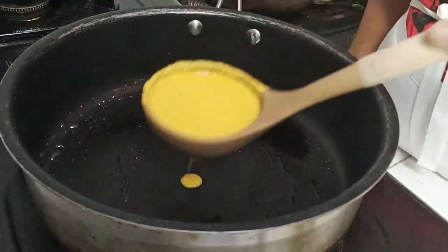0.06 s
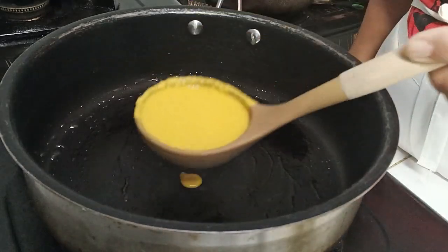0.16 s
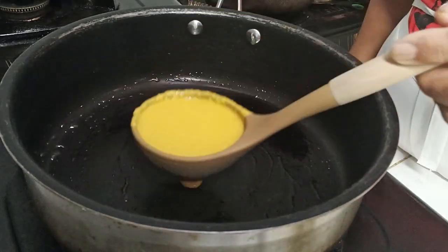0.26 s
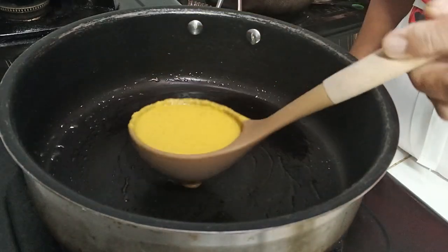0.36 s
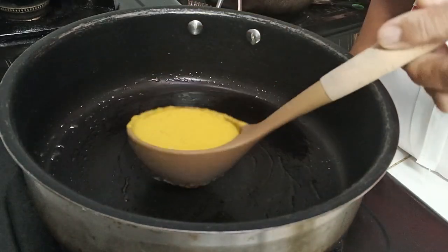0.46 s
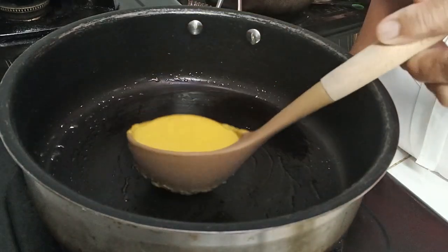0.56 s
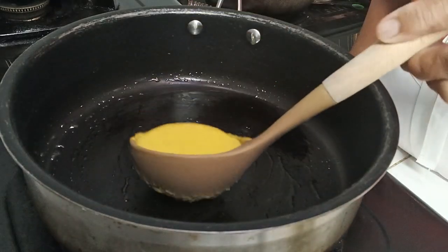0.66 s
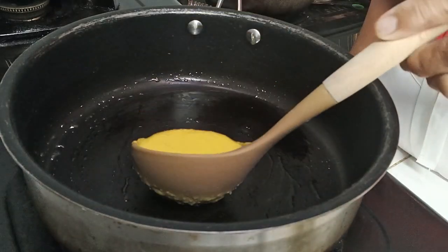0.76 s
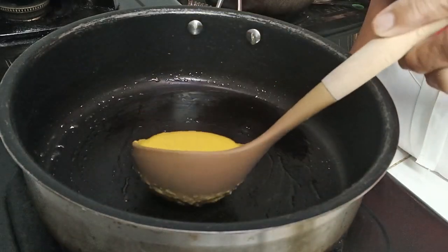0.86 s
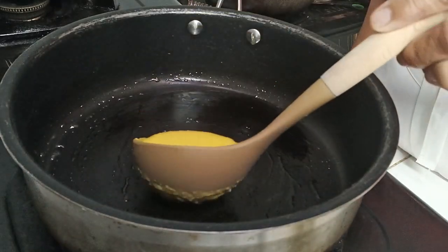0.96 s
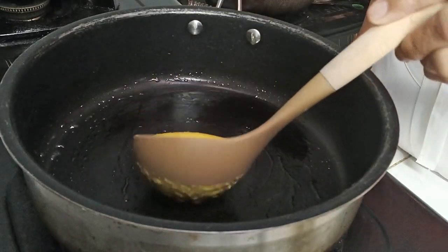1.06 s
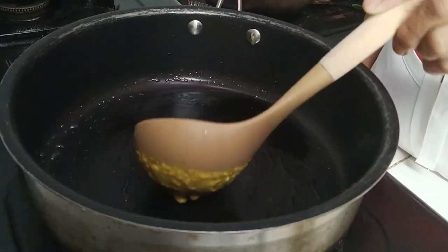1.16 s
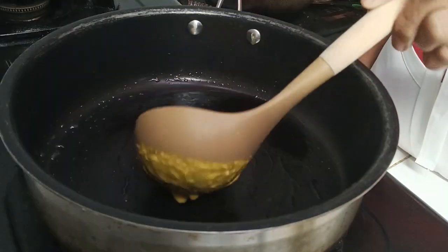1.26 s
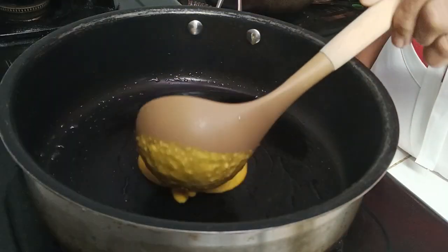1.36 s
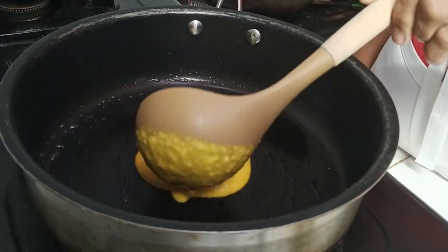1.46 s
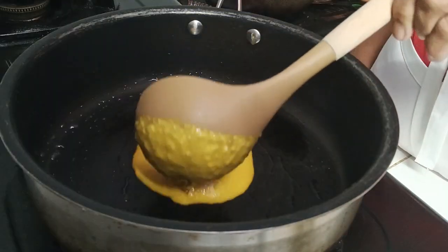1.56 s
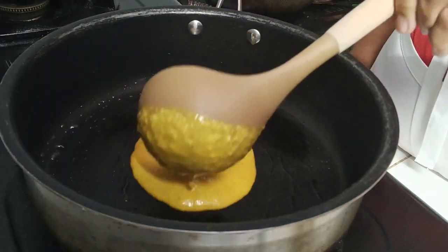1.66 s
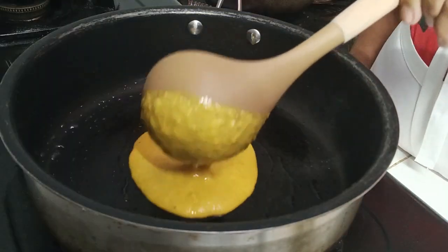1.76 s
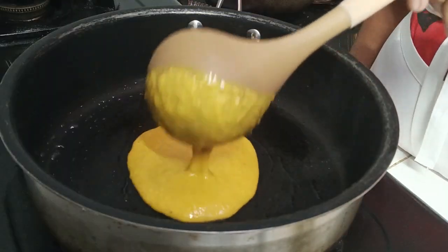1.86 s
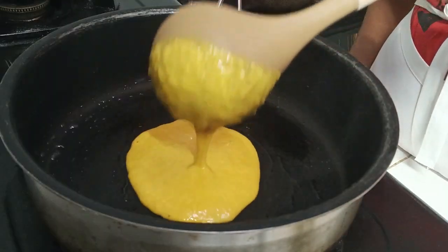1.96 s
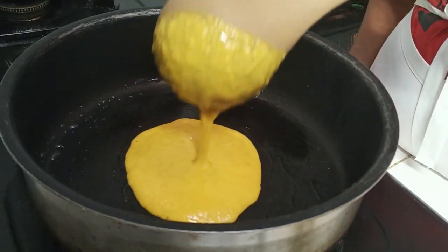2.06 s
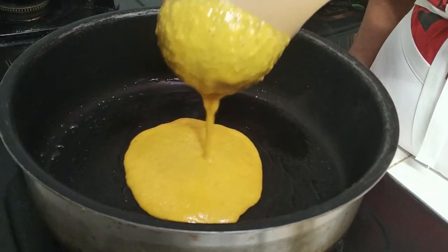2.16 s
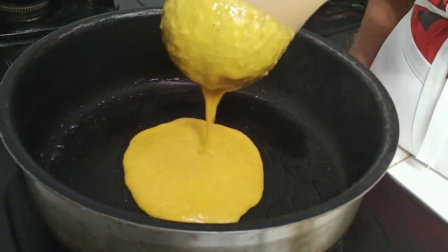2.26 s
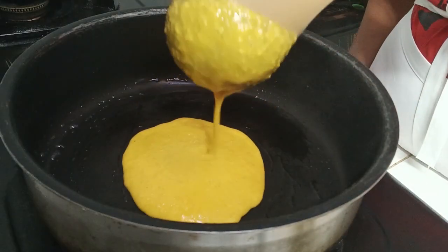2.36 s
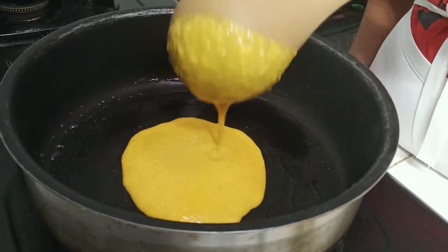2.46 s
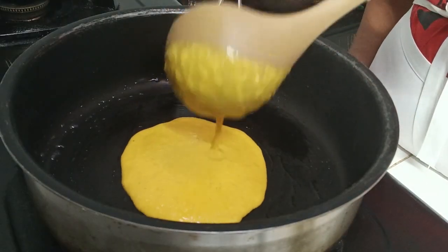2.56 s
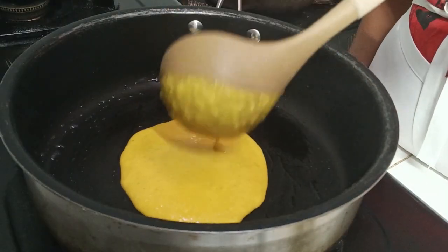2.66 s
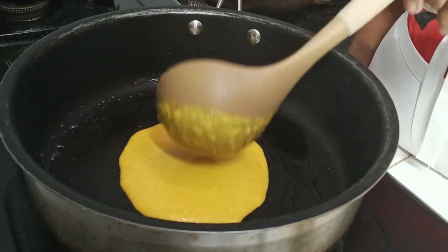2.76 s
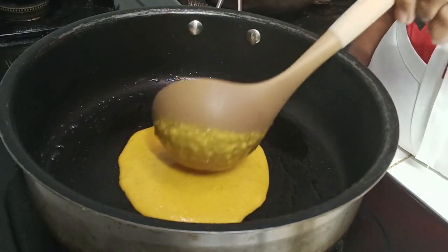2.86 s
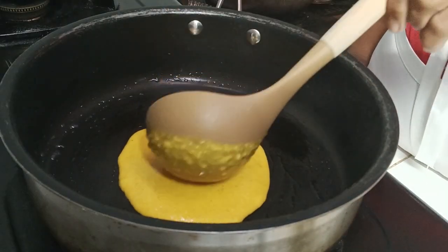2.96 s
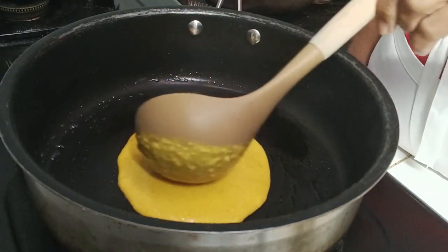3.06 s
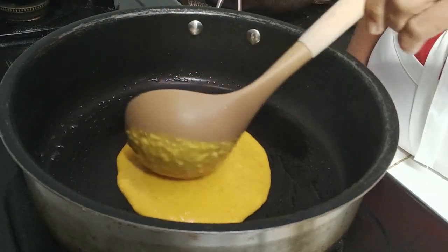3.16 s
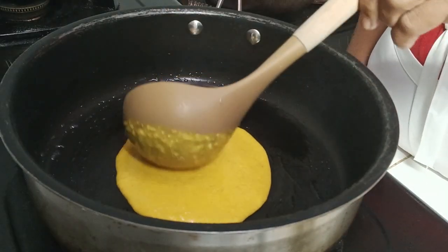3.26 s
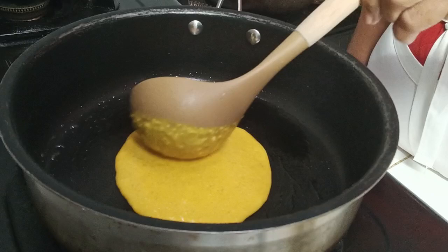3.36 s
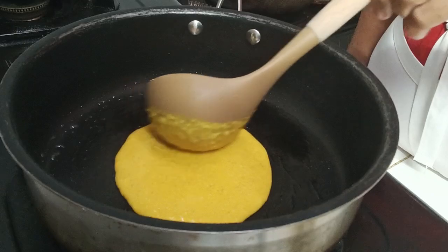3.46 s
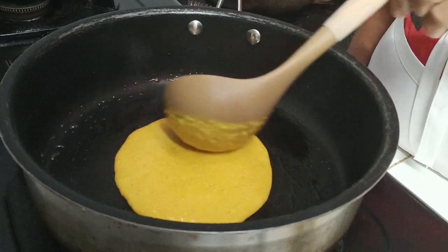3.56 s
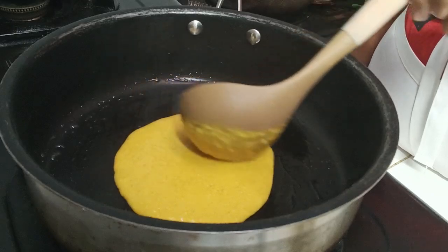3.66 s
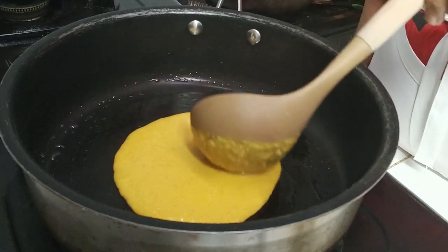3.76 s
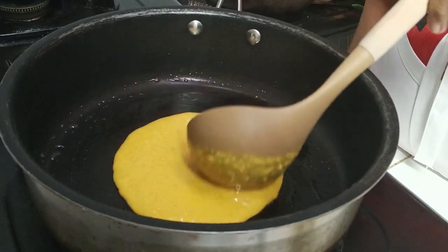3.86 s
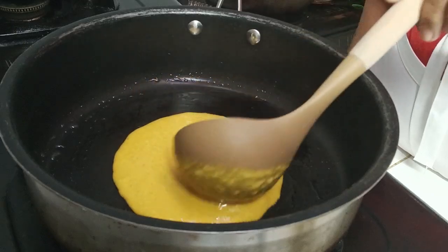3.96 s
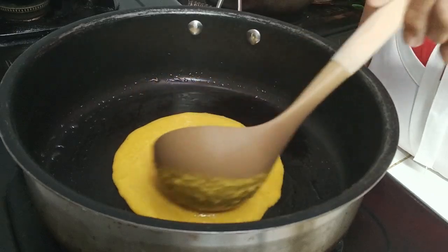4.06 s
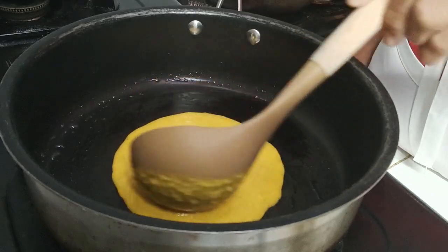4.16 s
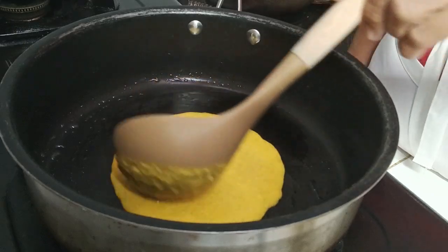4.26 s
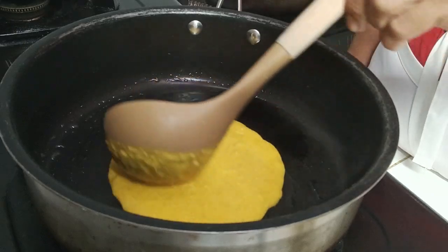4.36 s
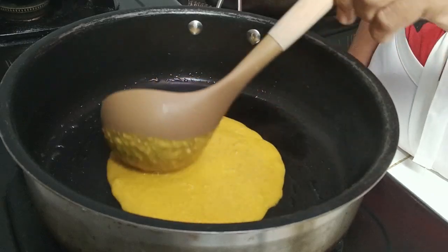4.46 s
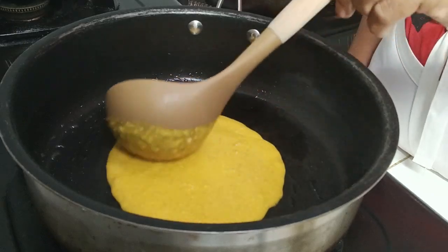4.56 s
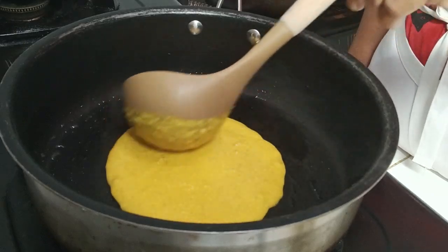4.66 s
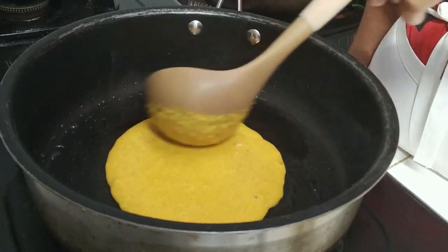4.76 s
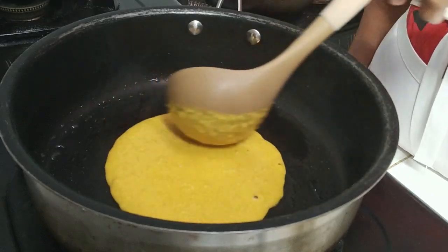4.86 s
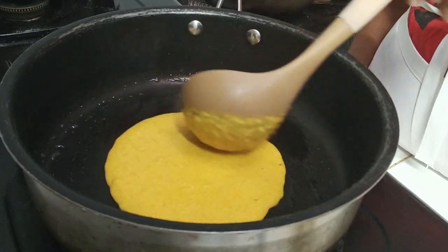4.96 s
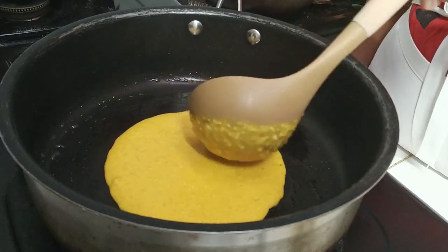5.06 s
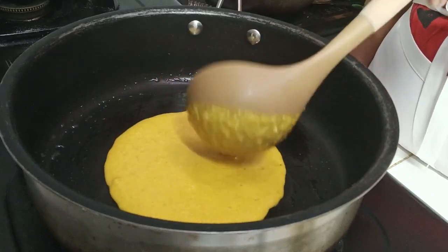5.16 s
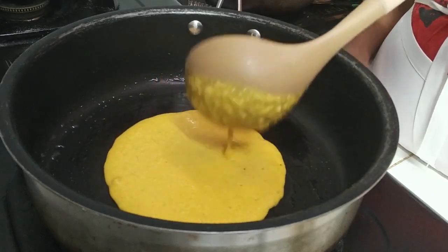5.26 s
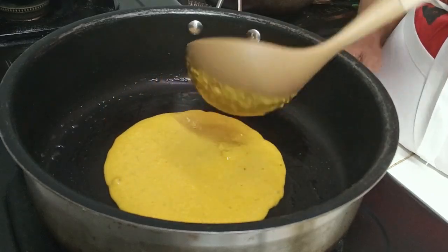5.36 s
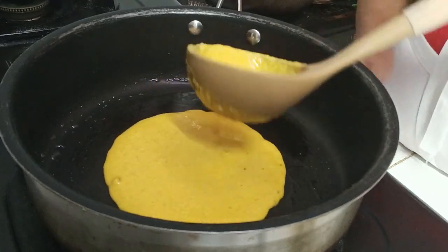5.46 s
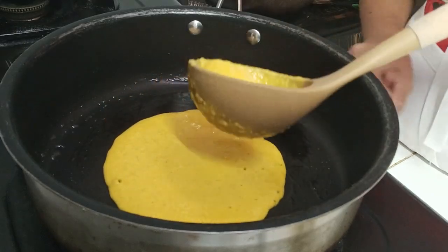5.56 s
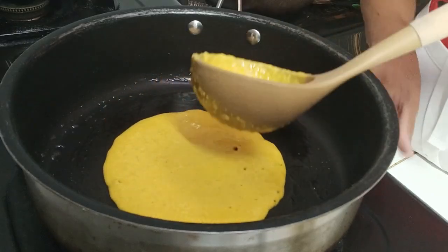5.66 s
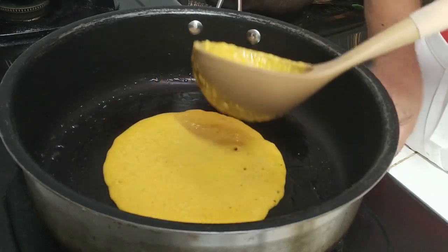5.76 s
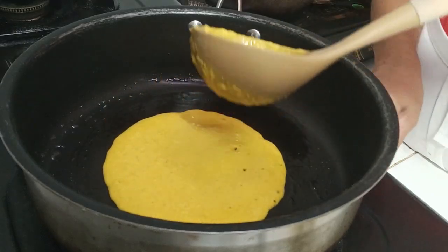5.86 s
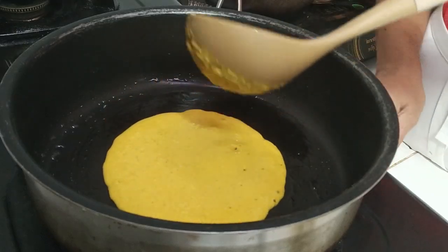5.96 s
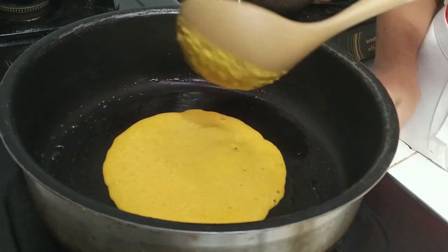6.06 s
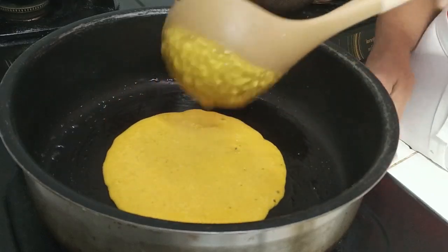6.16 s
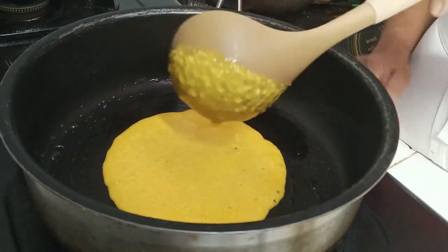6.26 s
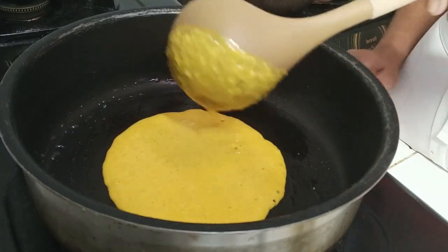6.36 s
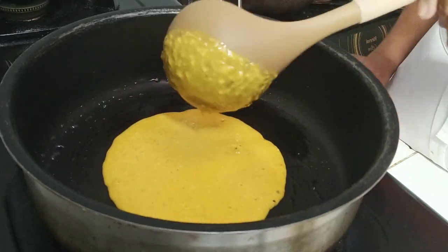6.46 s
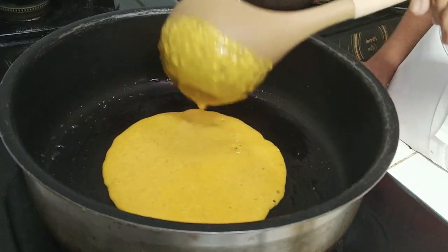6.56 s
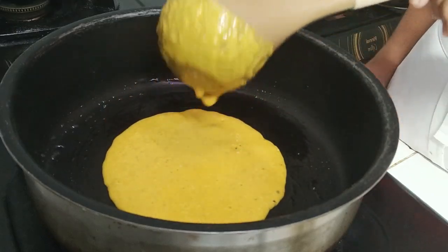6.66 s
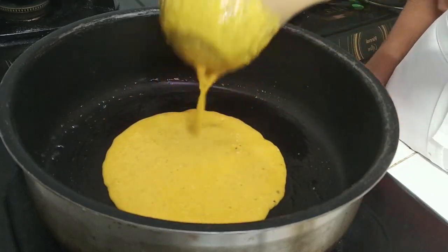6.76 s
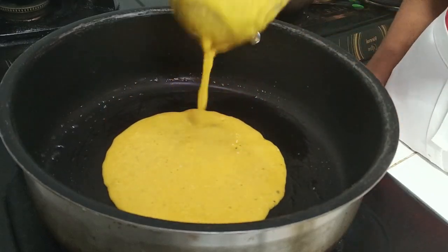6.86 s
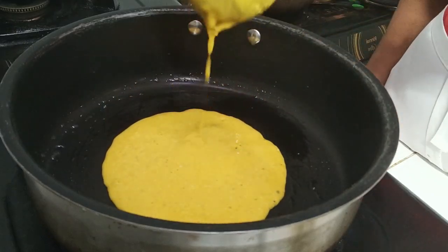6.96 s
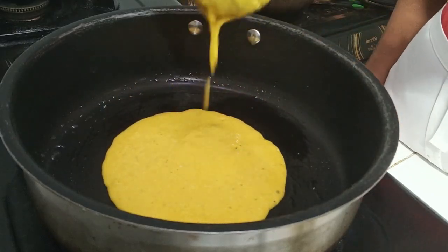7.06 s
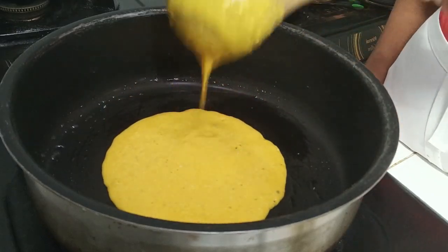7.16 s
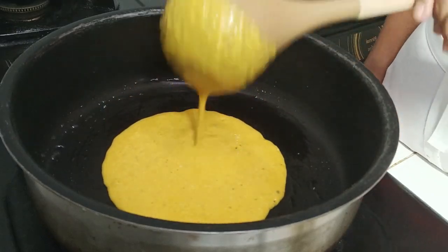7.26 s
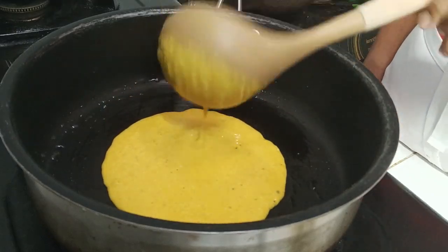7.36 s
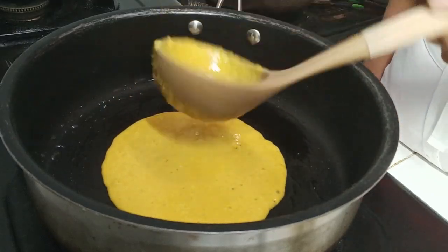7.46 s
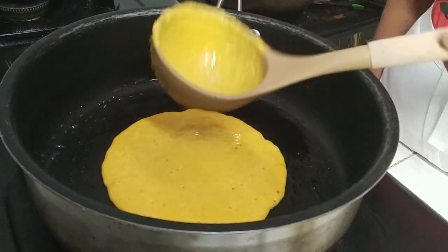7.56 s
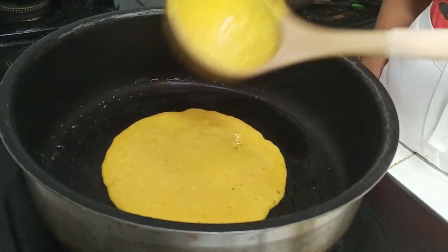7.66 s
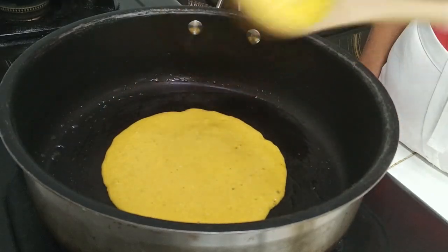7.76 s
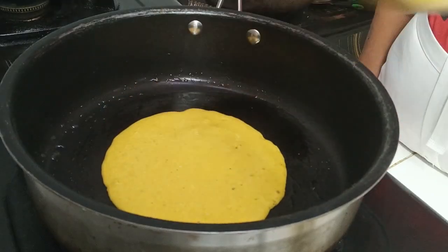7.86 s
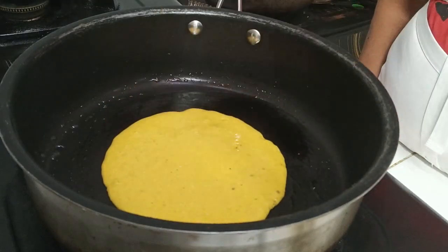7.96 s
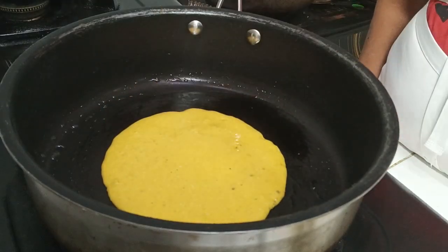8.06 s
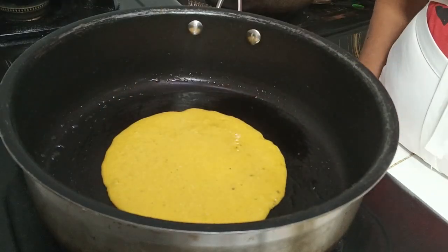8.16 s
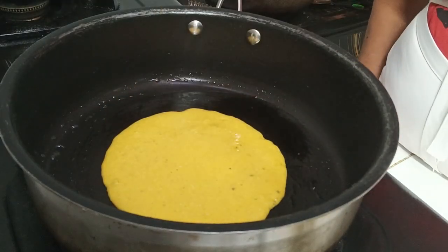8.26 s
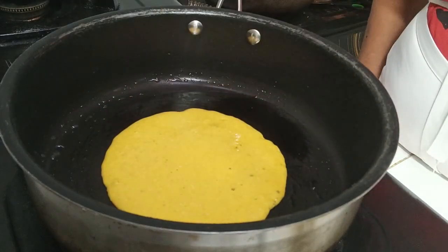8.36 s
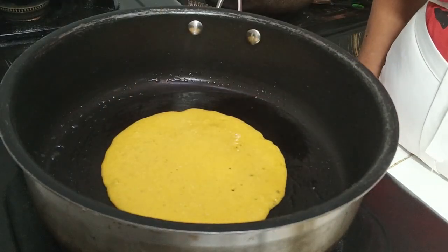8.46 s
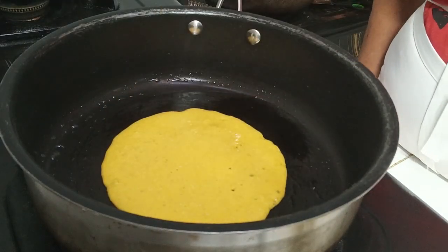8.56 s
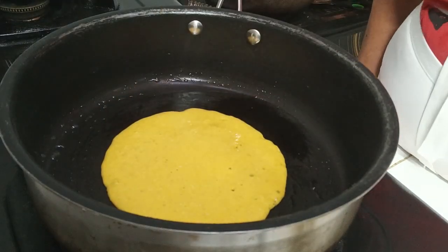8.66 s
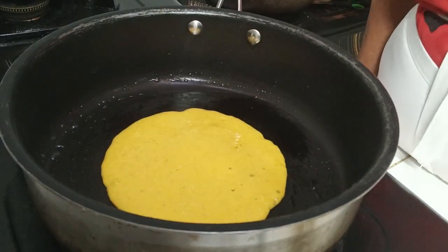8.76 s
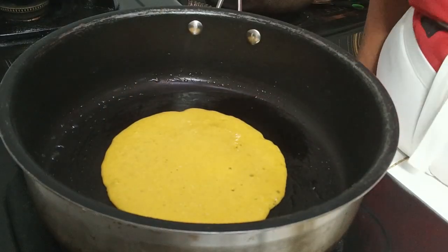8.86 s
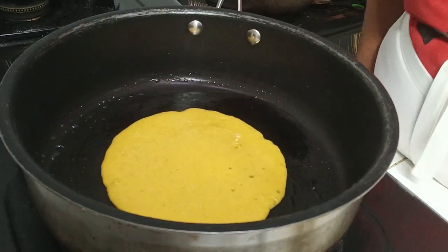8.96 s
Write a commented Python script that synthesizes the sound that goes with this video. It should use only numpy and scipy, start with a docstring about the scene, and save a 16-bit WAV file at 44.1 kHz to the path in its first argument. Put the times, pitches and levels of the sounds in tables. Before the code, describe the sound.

Batter sizzles in a hot oiled pan, swelling loudly as it is poured, then settling into a steady, crackling fry.

```python
"""In a kitchen, a ladle of batter touches down in a hot oiled pan and is poured out and spread.
Steam bubbles burst by the thousand. Trapped under the ladle, they ring the gap and batter pocket;
the pan squeals as the ladle rubs. As the batter sets, the bubbles thin to a crackle.
Three specks of spitting oil strike the right of a close microphone's two openings (ports), and the
last makes a limiter dip the volume. Behind it all, the room and a far engine drone faintly."""
import sys
import numpy as np
from scipy import signal
from scipy.fft import rfft, irfft, next_fast_len
from scipy.io import wavfile
from scipy.ndimage import uniform_filter1d, minimum_filter1d

SR = 44100
rng = np.random.default_rng(int(sys.argv[2]) if len(sys.argv) > 2 else 0)


def pcm_store(signal):
    """Save signal as 16-bit PCM."""
    levels = np.round(np.clip(np.atleast_2d(signal), -1, 1) * 32767)
    wavfile.write(sys.argv[1], SR, levels.astype(np.int16).T)


N = 397202
TIME = np.arange(N) / SR

# the tone of the room's drone: pitch_hz, gain_db
ROOM_TONE = [(20, -38.5), (45, -18.5), (80, -1), (125, 0), (180, 0), (300, -10.5), (450, -18.5), (700, -14),
             (2000, -21)]
# the note of a far engine outside: time_s, pitch_hz, left_level_db
ENGINE_NOTE = [(0, 117.1, -62.5), (5, 122.3, -66.5), (6.3, 136.6, -52.5), (7, 126.9, -67.5),
               (8.1, 127.9, -57), (8.65, 127.9, -47), (9, 147.3, -53)]
# how each port colours the frying: pitch_hz, left_gain_db, right_gain_db
PORT_TONE = [(96, -19.5, -36), (292, -11, -20), (456.3, -10, -13.5), (621, -2, -6), (1208, -5, -8.5),
             (3065, -2.5, -9), (4490, -1.5, -4), (5636, -1.5, 3), (6494, -3, 10), (7481, -11.5, 3.5),
             (7945, -11.5, -5.5), (10550, -16, -14), (13000, -10.5, -18.5), (14430, -4.5, -7),
             (14120, -1.5, -4)]
# air ringing in the pan's bowl (a minus share swings the other way):
# pitch_hz, width_hz, left_share, right_share
BOWL_RINGS = [(393.6, 14.9, 1.28, 0.97), (693, 81, 0.3843, 0.15), (814.8, 71, 0.5777, 0.94),
              (984.4, 102, -0.58, -0.16), (1124.6, 84.9, -3.5, 1), (1708, 852, 0.44, 0.327),
              (2740, 90, 0.6, 0.5), (3100, 240, -0.4429, -0.31), (3463, 170, 0.3949, -0.22)]
# oil specks hitting the right port: time_s, push_gain_db, tick_peak_db (before the limiter)
OIL_SPECKS = [(1.4762, -13, -25), (6.8979, -17.5, -21), (8.5039, 4, 8.3)]
# single loud bubbles: time_s, right_peak_db
LOUD_POPS = [(.2842, -20), (.3135, -19), (.3269, -19), (.3353, -16), (.3675, -21), (.399, -20), (.415, -19),
             (.442, -15), (.4822, -9.5), (.5145, -16), (.54, -16), (.586, -17), (.6333, -10), (.692, -16),
             (.7372, -12), (.8, -14), (.8857, -9), (3.491, -12), (4.321, -12), (4.906, -16), (5.101, -12),
             (6.375, -14), (6.389, -13), (6.404, -15), (6.5125, -12.5), (6.5335, -15), (6.5818, -10.5),
             (7.443, -18), (7.477, -18.5), (7.5222, -20), (7.7105, -21), (7.7483, -16), (7.8328, -19),
             (7.895, -14), (7.968, -21), (8.006, -20), (8.0304, -21), (8.0824, -21), (8.125, -19),
             (8.2027, -17), (8.3034, -18), (8.3873, -19), (8.6087, -20), (8.6505, -21), (8.7456, -19),
             (8.97, -21)]
# ringing of the thin gap under the ladle: pitch_hz, width_hz, gain_db
GAP_RINGS = [(1012.6, 37, -18), (1297.5, 10.1, -13), (2137, 110, -4), (2645, 22, -7.5), (2799, 40, -11.5),
             (3043, 39, -7.5), (3647, 129, -9.5), (4320, 21.4, -8), (5769, 105, -5)]
# ringing of the pocket of batter under the ladle: pitch_hz, width_hz, gain_db
POCKET_RINGS = [(329.7, 49.5, -13), (438.4, 92.3, -7), (618.2, 91.3, -4), (818.4, 37, -1), (908, 45.5, 4),
                (1004, 27, -7), (1305, 61, -8), (2327, 98, -3.5), (2655.4, 75, 1), (3037, 52, -6),
                (3780, 77, -2.5)]
# the metal pan's own notes above its whistle: pitch_hz, gain_db
PAN_HIGH_NOTES = [(2697, -6), (4540, 3), (4920, -4), (5772, -3)]
# the wet ladle touches, rests, then presses down: start_s, length_s, gap_gain_db, pocket_gain_db
LADLE_TOUCHES = [(0.074, 0.102, -39, -55), (0.262, 0.583, -45, -60), (0.895, 0.332, -39.5, -37)]
# the pan squeals as the ladle rubs: start_s, length_s, whistle_gain_db, high_notes_gain_db
PAN_SQUEALS = [(0.08, 0.0965, -49.5, -44), (0.265, 0.045, -47, -57.5), (0.745, 0.155, -43, -61.5),
               (.92, 0.34, -46, -44.5), (1.195, 0.044, -40, -39), (1.301, 0.088, -51, -45)]
# the steady hiss, as more or less wet batter meets the metal: time_s, base_level_db
HISS_LEVELS = [(0, -75), (.03, -38.5), (.23, -36.5), (.3, -36.8), (.66, -35.8), (.9, -28.5), (1.37, -26.5),
               (1.48, -36.5), (1.57, -32.5), (2.36, -33), (2.9, -33.5), (3.44, -36.5), (3.69, -32),
               (4.58, -36), (4.8, -35), (5.15, -35.7), (5.48, -33.5), (6.05, -43), (6.51, -35.5),
               (6.95, -39), (7.65, -38.3), (8.23, -41.5), (9, -39)]
# spurts of steam from under the batter, building up and quickly spent: peak_s, build_up_s, boost_db
STEAM_SPURTS = [(.11, 0.098, 5), (.7, 0.0274, 3.5), (2.1, 0.117, 1.68), (2.48, 0.25, 2.3), (3.07, 0.078, 0),
                (3.2, 0.036, 2.5), (3.34, 0.197, 0.5), (4.33, 0.15, 3), (4.53, 0.115, 5), (5.1, 0.172, 3.5),
                (5.55, 0.123, 1), (5.97, 0.263, 10), (6.235, 0.225, 6.5), (6.373, 0.103, 4),
                (6.84, 0.103, 4), (7.119, .06, 1), (7.38, 0.056, 2.3), (7.82, 0.205, 2.5),
                (8.32, 0.051, 1.8), (8.478, 0.043, 5), (8.641, 0.068, 2.5), (8.73, 0.031, 2)]

FLOOD_S, FLOOD_LENGTH_S = 0.727, 0.312  # the batter floods the oil
SETTING_S, SETTING_LENGTH_S = 5.936, 0.63  # the batter turns firm
BRIGHTEN_S, BRIGHTEN_LENGTH_S = 0.867, 0.82  # the highest fizz gradually brightens
LEFT_LAG_SAMPLES = 44  # sound reaches the left port later
WALL_ECHO_SAMPLES = int(.00178 * SR)  # delay of the echo off the wall behind the stove
TOP_HZ = 15950  # treble above this is cut


def amp(db):
    """Turn decibels into a number to multiply by."""
    return 10 ** (np.asarray(db) / 20)


def curves(table):
    """The columns of a table, joined by straight lines in time."""
    times, *columns = np.transpose(table)
    return [np.interp(TIME, times, column) for column in columns]


def ramp(start_s, length_s):
    """Rise from 0 to 1 and stay there."""
    return np.clip((TIME - start_s) / length_s, 0, 1)


def touch(start_s, length_s, fade_db_per_s, rise_s=0.0211):
    """Rise quickly up to the start, hold, then die away evenly."""
    fade = amp(-fade_db_per_s * np.maximum(TIME - start_s - length_s, 0))
    return ramp(start_s - rise_s, rise_s) * fade


def wander(per_s):
    """Glide to a new random value, typically about 1 from zero, per_s times a second."""
    hold = int(SR / per_s)
    steps = np.repeat(rng.standard_normal(N // hold + 1), hold)
    return 1.43 * uniform_filter1d(steps, hold)[:N]


def filtered(x, gain_at):
    """Turn each frequency up or down by gain_at(hz)."""
    size = next_fast_len(N + SR // 2)
    hz = np.maximum(np.arange(size // 2 + 1) * SR / size, 1)
    return irfft(rfft(x, size) * gain_at(hz), size)[..., :N]


def colour(x, table):
    """Shape the tone with a table of pitches and one gain column, or one for each port."""
    pitches, *columns = np.transpose(table)
    return filtered(x, lambda hz: amp([np.interp(np.log(hz), np.log(pitches), c) for c in columns]))


def unit(x):
    """Scale a stereo sound so the average of its two sides has a level (rms) of 1."""
    return x / x.mean(0).std()


def band_level(x, low_hz, high_hz):
    """The level (rms) of the average of both sides, between two frequencies."""
    return filtered(x.mean(0), lambda hz: (hz > low_hz) & (hz < high_hz)).std()


def to_peaks(sound, times, peaks_db):
    """Scale each short event to its peak level at the right port."""
    peaks = np.array([np.abs(sound[1, at:at + SR // 200]).max() for at in (times * SR).astype(int)])
    return sound * np.interp(TIME, times, amp(peaks_db) / peaks)


def thin(x, keep):
    """A tearing film gives off mostly treble; a smaller keep leaves less bass."""
    return signal.lfilter([1, keep - 1], [2 - keep], x)


def ports(x):
    """Add each port's colour, then apply the overall top-treble cut."""
    return filtered(colour(x, PORT_TONE), lambda hz: 1 / (1 + (hz / TOP_HZ) ** 80))


def resonate(x, rings):
    """A small hollow rings at its own pitches and muffles the rest."""
    def gain_at(hz):
        return sum(amp(db) / (1 + 1.3j * (hz - pitch) / width) ** 2 for pitch, width, db in rings)
    return unit(filtered(x, gain_at))


def surroundings(x, wall_echo=(.17, .08), room_db=-12, room_fade_s=0.219):
    """The direct sound, one near echo and the room's echo, all coloured by the pan's bowl."""
    t = TIME[:SR // 3]
    tail = rng.standard_normal((2, len(t))) * amp(-60 * t / room_fade_s)
    paths = amp(room_db) * tail / np.linalg.norm(tail, axis=1, keepdims=True)
    paths[:, 0] += 1  # the direct sound
    paths[:, WALL_ECHO_SAMPLES] += wall_echo
    bowl = sum(np.array(shares)[:, None] * signal.lfilter(*signal.iirpeak(hz, hz / width, SR), paths)
               for hz, width, *shares in BOWL_RINGS)
    return signal.oaconvolve(x, paths + bowl, axes=1)[:, :N]


def bursts(times, sizes, snap_s=.00008, rattle_s=0.00142, rattle_db=-3, samples=40):
    """Each bubble bursts with a tiny snap and a brief rattle between the pan's sides."""
    n = np.arange(samples)

    def dying_noise(fade_s):
        noise = rng.standard_normal((len(times), samples)) * np.exp(-n / SR / fade_s)
        return noise * (sizes / np.linalg.norm(noise, axis=1))[:, None]

    def at_port(starts):
        sounds = snaps + amp(rattle_db) * dying_noise(rattle_s)
        return np.bincount((starts[:, None] + n).ravel(), sounds.ravel(), N)[:N]  # add them all up
    snaps = dying_noise(snap_s)
    right = (times * SR).astype(int)
    lags = LEFT_LAG_SAMPLES + 3 * rng.standard_normal(len(times))  # each bubble has its own place
    left = right + np.round(lags).astype(int)
    return np.array([at_port(left), at_port(right)])


def bubbles(per_s, skew, span, **shape):
    """Bubbles burst at random moments; a plus skew favours small ones, a minus skew large ones."""
    when, how_big = rng.random((per_s * N // SR, 2)).T
    size_db = -skew * np.log(1.5 - how_big * (1 - np.exp(-span / skew)))
    return unit(bursts(when * N / SR, amp(size_db), **shape))


def kitchen(level_db=-58.5, growth_db_per_s=0.2453, right_db=-6, waver_db=2.1):
    """The room drones low and slowly grows, stronger at the left port."""
    noise = rng.standard_normal((2, N)) + 0.6 * rng.standard_normal(N)  # partly shared by both sides
    drone = unit(colour(noise, ROOM_TONE) * amp([[0], [right_db]]))
    return drone * amp(level_db + growth_db_per_s * TIME + waver_db * wander(14))


def engine(right_db=-9, waver_db=2.74):
    """The firing note of a far engine comes through the walls, wavering."""
    hz, db = curves(ENGINE_NOTE)
    pitch_hz = hz * (1 + 0.026 * wander(18))
    note = np.sin(2 * np.pi * np.cumsum(pitch_hz) / SR) * amp(db + waver_db * wander(20))
    return note * amp([[0], [right_db]])


def oil_specks(push_s=0.0014, rise_s=.0001, leak_hz=85, tick_s=0.00025, left_db=-15):
    """A speck hits the right port: a tick, and a push of air that leaks away and swings back."""
    push, tick = np.zeros(N), np.zeros(N)
    t = TIME[:SR // 50]
    for time_s, push_db, _ in OIL_SPECKS:
        at = int(time_s * SR)
        push[at:at + len(t)] -= amp(push_db) * np.exp(-t / push_s) * (1 - np.exp(-t / rise_s))
        tick[at:at + len(t)] += np.exp(-t / tick_s) * rng.standard_normal(len(t))
    push = signal.sosfilt(signal.butter(2, leak_hz, "high", fs=SR, output="sos"), push)
    times, _, ticks_db = np.transpose(OIL_SPECKS)
    left, right = to_peaks(ports(thin(tick, keep=0.35)), times, ticks_db)
    return np.array([amp(left_db) * np.roll(left, LEFT_LAG_SAMPLES), right + push])


def pops(edge_hz=7400, top_db=-6):
    """Large bubbles burst as sharp spits, too big to reach as high as the fizz."""
    times, peaks_db = np.transpose(LOUD_POPS)
    snaps = bursts(times, np.ones(len(times)), snap_s=.00055, rattle_s=.0025, rattle_db=-4.5, samples=500)
    spits = ports(surroundings(thin(snaps, keep=.1)))
    dulled = filtered(spits, lambda hz: amp(top_db) + (1 - amp(top_db)) / (1 + (hz / edge_hz) ** 8))
    return to_peaks(dulled, times, peaks_db)


def squeal(notes, waver_db, waver_rad):
    """The pan's metal keeps ringing, each note wavering a little in level and pitch."""
    sound = 0
    for hz, db in notes:
        level = amp(db + waver_db * wander(27.3))
        sound += level * np.sin(2 * np.pi * hz * TIME + waver_rad * wander(36.64))
    return sound / sound.std()


def ladle(lean_left_db=4.5, gap_fade_db_per_s=139, pocket_fade_db_per_s=44, pan_fade_db_per_s=260.5):
    """Trapped steam rings the gap and the batter pocket; the pan squeals as the ladle rubs."""
    gap = pocket = whistle = high_notes = 0
    for start_s, length_s, gap_db, pocket_db in LADLE_TOUCHES:
        gap += amp(gap_db) * touch(start_s, length_s, gap_fade_db_per_s)
        pocket += amp(pocket_db) * touch(start_s, length_s, pocket_fade_db_per_s)
    for start_s, length_s, whistle_db, high_db in PAN_SQUEALS:
        held = touch(start_s, length_s, pan_fade_db_per_s)
        whistle = np.maximum(whistle, amp(whistle_db) * held)
        high_notes = np.maximum(high_notes, amp(high_db) * held)
    steam = surroundings(bubbles(per_s=1500, skew=-1, span=13.5))
    sound = gap * resonate(steam, GAP_RINGS) + pocket * resonate(steam, POCKET_RINGS)
    sound += whistle * squeal([(1914, 0)], waver_db=1, waver_rad=.2)  # one clean note at 1914 Hz
    sound += high_notes * squeal(PAN_HIGH_NOTES, waver_db=2, waver_rad=0.61)
    return sound * amp([[lean_left_db], [-lean_left_db]])


def frying(oil_db=-21, wet_db=-12, set_db=-14, flutter_db=.9, spurt_fall_s=0.0434):
    """Wet batter fries full and fine; bare oil and set batter are thinner, grainy and restless."""
    flooded, firm = ramp(FLOOD_S, FLOOD_LENGTH_S), ramp(SETTING_S, SETTING_LENGTH_S)
    wet = flooded - firm
    spurts_db = sum(np.interp(TIME, [peak_s - build_s, peak_s, peak_s + spurt_fall_s], [0, db, 0])
                    for peak_s, build_s, db in STEAM_SPURTS)
    hiss_db = curves(HISS_LEVELS)[0] + spurts_db + flutter_db * (1 - wet / 2) * wander(18)
    body_db = oil_db * (1 - flooded) + wet_db * wet + set_db * firm  # the lows against the hiss
    crackle_share = 0.308 * (1 - wet) + 0.0485 * wet
    return hiss_db, body_db, crackle_share


def sizzle(body_edge_hz=3300, top_edge_hz=9000, dull_db=-4.5, bright_db=2.5, sputter_db=0.42):
    """Bursting steam bubbles make a fine fizz and thin crackles; wet batter adds a lower body."""
    hiss_db, body_db, crackle_share = frying()
    fizz_share = 1 - crackle_share
    fizz = bubbles(per_s=4000, skew=-0.5, span=3, rattle_db=-1) * amp(sputter_db * wander(45))
    large_bubbles = bubbles(per_s=210, skew=7, span=22, snap_s=.00013, rattle_db=-9, samples=120)
    crackle = 1.3 * unit(thin(large_bubbles, keep=.22))
    mix = np.sqrt(fizz_share) * fizz + np.sqrt(crackle_share) * crackle
    sound = colour(surroundings(mix), PORT_TONE)
    # with the ladle gone and the batter setting, the wall behind the stove echoes more and sounds hollow
    sound += .15 * ramp(SETTING_S, SETTING_LENGTH_S) * np.roll(sound, WALL_ECHO_SAMPLES, axis=1)
    body = filtered(sound, lambda hz: 1 / (1 + (hz / body_edge_hz) ** 4))
    top = filtered(sound, lambda hz: 1 / (1 + (top_edge_hz / hz) ** 8))
    # the highest fizz starts dull and gradually brightens
    top_db = dull_db + (bright_db - dull_db) * ramp(BRIGHTEN_S, BRIGHTEN_LENGTH_S)
    treble = (sound - body + (amp(top_db) - 1) * top) / band_level(sound, 4500, 16000)
    # the lows come mostly from the fizz, so even out its changing share
    body = body / band_level(sound, 550, 1700) * np.sqrt(fizz_share.mean() / fizz_share)
    return amp(hiss_db) * (treble + amp(body_db) * body)


def scene():
    """The frying pan in front, the room and the engine behind."""
    return sizzle() + ladle() + pops() + oil_specks() + kitchen() + engine()


def record(dry, ceiling=.76, hold_s=.058, release_s=.02):
    """A limiter turns both sides down at a loud peak, holds and lets go; then the top treble is cut."""
    safe_gain = np.minimum(1, ceiling / (np.abs(dry).max(0) + 1e-9))
    hold = int(hold_s * SR) | 1
    held = minimum_filter1d(safe_gain, hold, origin=hold // 2 - SR // 2000)
    decay = np.exp(-1 / (release_s * SR))
    smooth_dip = signal.lfilter([1 - decay], [1, -decay], 1 - held)
    gain = np.minimum(held, 1 - smooth_dip)
    treble_cut = signal.ellip(10, .2, 70, TOP_HZ, fs=SR, output="sos")
    return signal.sosfilt(treble_cut, dry * gain)


dry = scene()
out = record(dry)
pcm_store(out)
```